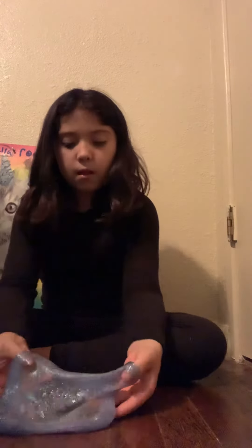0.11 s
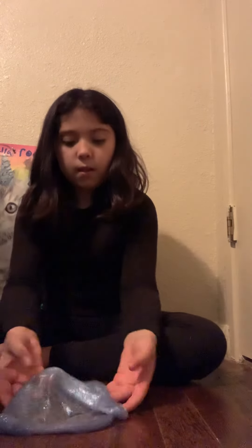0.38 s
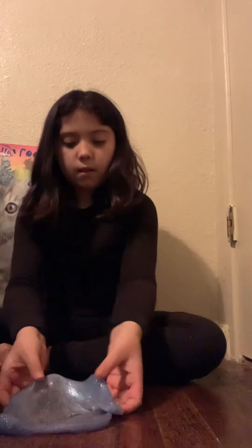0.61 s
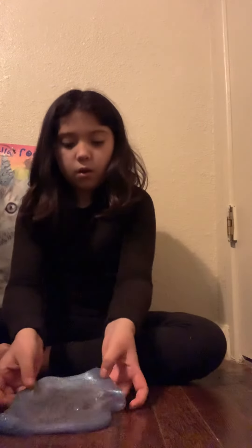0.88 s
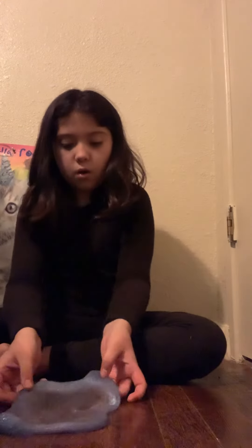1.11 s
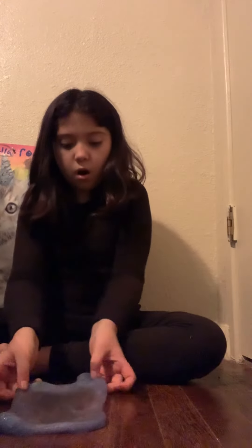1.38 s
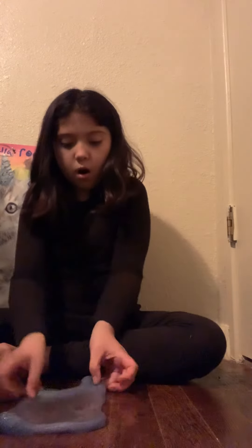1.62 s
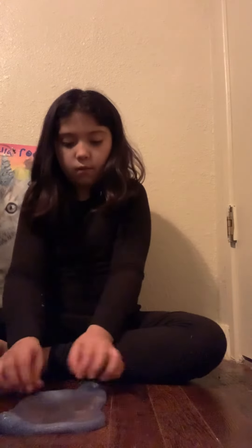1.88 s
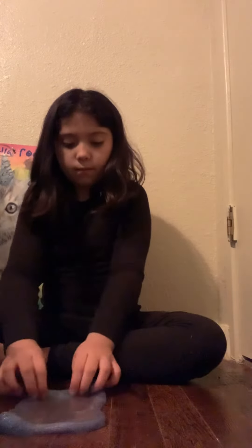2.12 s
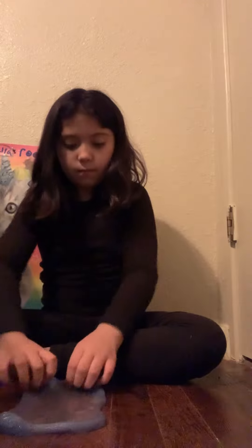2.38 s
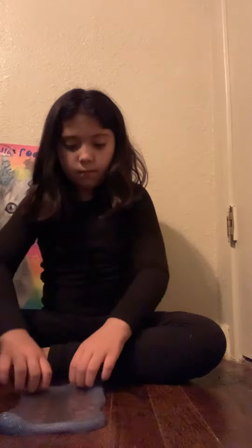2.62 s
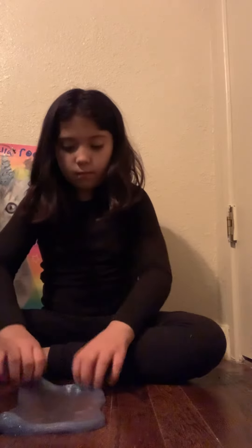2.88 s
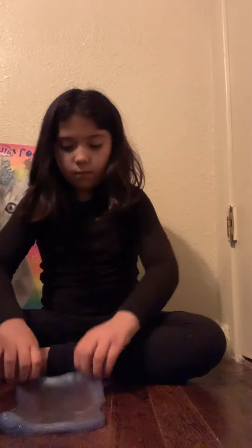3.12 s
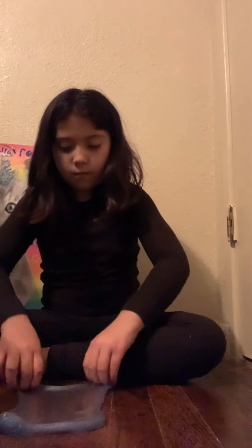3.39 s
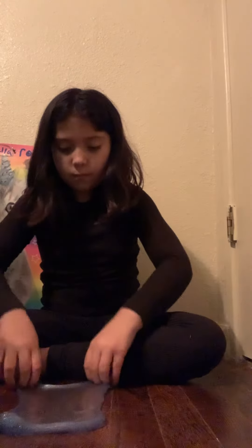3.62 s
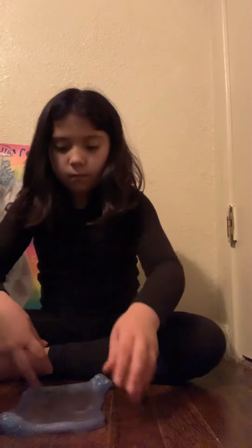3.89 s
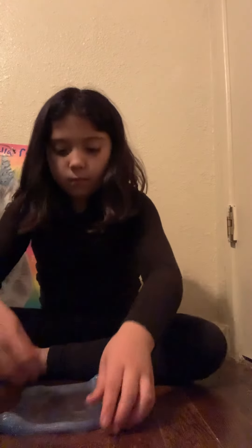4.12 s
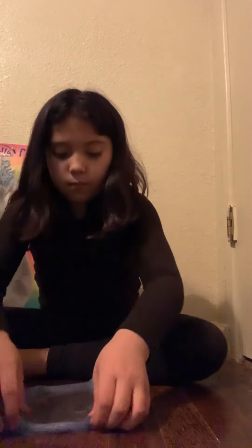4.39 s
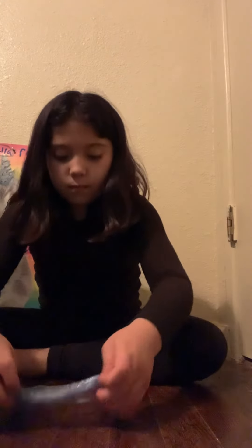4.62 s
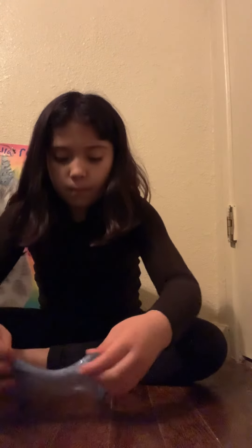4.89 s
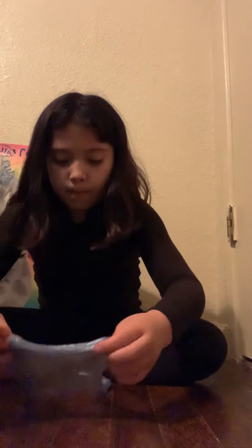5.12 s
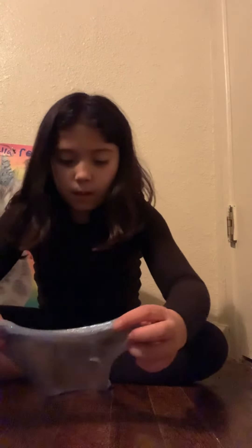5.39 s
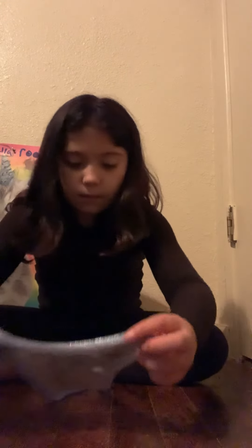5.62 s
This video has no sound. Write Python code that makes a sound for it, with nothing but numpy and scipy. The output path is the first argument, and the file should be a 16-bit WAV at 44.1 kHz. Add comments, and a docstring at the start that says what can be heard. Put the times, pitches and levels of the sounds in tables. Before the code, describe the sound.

Steady hammering on wood echoes through a home, about three blows a second, while someone quietly handles sticky putty close by.

```python
"""The tail of a hammer blow already rings over a quiet hum and a fine putty crackle; more blows follow.
Each runs ahead through the floor as a thud of filtered noise, then knocks: short pulses through wood resonances.
Banded noise then builds and dies as the rooms' diffuse tail, with decaying sines for the low air and panel modes.
Between blows, close to the microphone, putty peels in soft noise bursts, one longer and lower like a breathy squeak.
Brief sine cycles answered by noise make a dull knock just ahead of an early blow, then finger bumps and putty pops."""
import sys
import numpy as np
from scipy import signal
from scipy.fft import rfft, irfft, next_fast_len
from scipy.io import wavfile
from scipy.ndimage import uniform_filter1d, minimum_filter1d

SR = 44100
rng = np.random.default_rng(int(sys.argv[2]) if len(sys.argv) > 2 else 0)


def nominal_scale(level):
    """Amplitude ratio for a level in decibels (scalar or array-like)."""
    x = np.asarray(level, float) / 20
    return 10 ** x


def wav_record(signal):
    """Record a signal, one row per channel, as 16-bit PCM in the file named by sys.argv[1]."""
    frames = np.transpose(np.atleast_2d(signal))
    bounded = np.clip(frames, -1, 1)
    # unit amplitude maps onto the largest positive 16-bit level
    quanta = np.round(bounded * 32767).astype(np.int16)
    wavfile.write(sys.argv[1], SR, quanta)


N = 253838

# hammer blows: time_s, level_db, wood_ring_hz, weight_db, squareness_db
HAMMER_BLOWS = [(-0.27, -17, 1700, 9, 5), (0.046, -15, 1450, 3.5, -3.5), (0.4245, -15.5, 1450, 5, 3),
                (0.7918, -14, 1720, 2, -2), (1.1442, -15, 1800, 1.9, 0.6), (1.512, -13.5, 1710, 1.2, -1),
                (1.8482, -13, 1720, 3.1, 1), (2.225, -13, 1770, -0.7, 2.1), (2.668, -27, 1710, -5.5, -0.5),
                (2.9867, -21, 1830, 4, 1), (3.3267, -13.5, 1690, 2.7, 1.5), (3.7045, -13.5, 1900, 4, 3.5),
                (4.0737, -14.5, 1535, 3.5, 2.5), (4.5378, -19, 2000, 1.4, -0.1),
                (4.8677, -15.5, 1940, 3, 2), (5.2381, -14.5, 1980, 2.5, 2.5),
                (5.5967, -14.5, 1690, 0.7, 1.8)]
# how a blow colours its sound: freq_hz, plain_db, db_per_weight_db, db_per_squareness_db
# weight drives the low boards and the top sheen; a square blow trades floor boom for body and brightness
STRIKE_COLOUR = [(111, -1.4, 0.17, -0.95), (307, -0.5, 1.14, 0.32), (910, 0, 0.3, 1.36), (1840, 0, 0, 0),
                 (2860, -0.25, 0, 0.54), (4560, -2, -0.18, 0.67), (8000, -2.5, 0.2, 0.52),
                 (11900, -2, 1.6, -0.36)]
# first arrivals of a blow off the nearest walls, before scatter: delay_s, level_db, inverted (true or false)
FIRST_ARRIVALS = [(0, 3, False), (.0037, 6, True), (.008, 4.5, False), (0.015, 1, False),
                  (0.025, -12, True)]
# resonances of the struck wood in the first arrivals: freq_hz, width_hz, level_db
WOOD_RESONANCES = [(890, 64, -19.5), (1450, 650, -11.5), (1720, 236, 4), (4240, 240, 18.5),
                   (7500, 900, -26)]
# narrow bands of the ringing steel head, before scatter: freq_hz, width_hz, level_db
STEEL_RESONANCES = [(3510, 940, -26.5), (7350, 1430, 1), (8030, 160, 0.5), (10200, 1130, -1),
                    (14350, 350, -5.5)]
# diffuse tail colour, relative: freq_hz, density_db (per Hz)
TAIL_COLOUR = [(30, -15), (52, -5), (93, 4), (434, -6.5), (763, -9), (1100, -6.5), (1920, -5),
               (2550, -12.5), (3950, -7), (4490, -12), (8000, -22), (8400, -24.5), (12500, -30.5),
               (15500, -30)]
# how the rooms answer: freq_hz, t60_s, build_up_s, likeness_from_blow_to_blow (0-1)
ROOM_DECAY = [(50, 0.58, 0.017, 0.84), (121.2, 0.51, 0.077, 1), (350, 0.44, 0.0082, 0.94),
              (950, 0.43, 0.0042, 0.26), (2430, 0.42, 0.0057, 0.54), (4810, 0.39, 0.0081, 1),
              (8000, 0.28, 0.01, 0), (11000, 0.22, 0.006, 1), (15000, 0.21, 0.0091, .3)]
# air and panel modes excited by every blow, relative and before scatter: freq_hz, level_db, t60_s
HOUSE_MODES = [(56, -6, 1.0), (102, -9, .7), (236, -6, .5), (260, -8, .5), (528, -9, .45), (628, -10, .45),
               (943, -14, .45), (1126, -14, .45), (1462, -10, .45), (1550, -13, .45), (1647, -11, .45),
               (1719, -10, .45), (1878, -14, .45), (1951, -14, .45), (2065, -12, .45), (2258, -16, .45)]
# noise floor colour, relative: freq_hz, density_db (per Hz)
HOUSE_NOISE = [(18, -38), (30, -10), (65, 2.5), (153, -10.5), (240, -4), (742, -28.5), (1880, -32),
               (2600, -32), (3880, -35), (12000, -65), (15600, -82), (22000, -120)]
# how busy the hands are with the putty: time_s, crackle_level_db
PUTTY_RUSTLE = [(0, -79), (1.202, -92), (1.7, -77), (2.201, -82), (2.6, -90), (3.5, -82), (4.2, -92),
                (4.451, -69.5), (4.6, -85), (5.15, -78), (5.45, -92), (5.76, -70)]
# putty peels, and one longer, lower breathy squeak: start_s, level_db, centre_hz, length_s
SOFT_BURSTS = [(0.107, -60, 13500, 0.016), (0.227, -68.5, 9000, 0.049), (1.682, -66, 11000, 0.023),
               (2.165, -70, 8000, 0.0064), (2.205, -65, 8000, 0.012), (3.505, -72, 11000, 0.0038),
               (3.58, -66, 11000, 0.012), (3.649, -62, 7000, 0.048), (4.338, -71, 8550, 0.006),
               (4.397, -58.5, 5960, 0.0077), (4.406, -67, 9050, 0.003), (4.461, -63, 2230, 0.08),
               (5.112, -68, 11000, 0.0037), (5.183, -65, 6200, 0.03), (5.212, -65, 7500, 0.021),
               (5.41, -69, 9900, .035)]
# finger bumps, putty pops, and a dull knock through the floor just ahead of a blow:
# start_s, level_db, pitch_hz, length_cycles
BUMPS_AND_POPS = [(0.389, -51, 597, 2.5), (0.391, -44, 292, 4.1), (2.667, -44, 304, 2.5),
                  (2.846, -47, 890, 2.4), (2.847, -38.5, 324, 1.5), (2.929, -43.5, 322, 1.6),
                  (2.945, -48, 690, 3.7), (3.2, -38, 2290, 3), (3.204, -36.5, 323, 1.3),
                  (3.215, -39.5, 1400, 3), (3.65, -44.5, 1520, 3.5)]

SCATTER_DB = 2.5  # spread of the house modes and steel bands from blow to blow
HARD_BLOW_DB = -13  # knock and ring gain a further dB for each dB of blow level above this, and lose it below


def unit(x):
    """Scale to rms 1."""
    return x / np.sqrt(np.mean(x ** 2) + 1e-20)


def along(hz, at_hz, values):
    """Values read on a log frequency axis."""
    return np.interp(np.log(hz + 1), np.log(np.asarray(at_hz) + 1), values)


def colour(curve):
    """A zero-phase response drawn by (Hz, dB) points."""
    return lambda f: nominal_scale(along(f, *np.transpose(curve)))


def filtered(x, response):
    """x times a complex response of frequency."""
    m = next_fast_len(x.shape[-1] + 8192)
    spectrum = rfft(x, m) * response(np.fft.rfftfreq(m, 1 / SR))
    return irfft(spectrum, m)[..., :x.shape[-1]]


def band(lo_hz, hi_hz):
    """A causal band-pass response."""
    return lambda f: (1j * f / (lo_hz + 1j * f)) ** 2 * (hi_hz / (hi_hz + 1j * f)) ** 2


def resonances(modes):
    """The causal response of (Hz, width Hz, dB) modes, summed with alternating sign."""
    def response(f):
        total = 0
        for k, (hz, width, db) in enumerate(modes):
            total = total + (-1) ** k * nominal_scale(db) * 1j * f * width / (hz * hz - f * f + 1j * f * width)
        return total
    return response


def add(track, s, sound):
    """Mix a sound in at time s, trimming whatever falls outside the track."""
    start = round(s * SR)
    sound = sound[max(-start, 0):]
    part = track[max(start, 0):][:len(sound)]
    part += sound[:len(part)]


def floor_thud(t):
    """The boards carry a dull noise burst that rises at once and is cut short while still decaying."""
    lo_hz, hi_hz, rise_s, t60_s = 130, 766, 0.0017, 0.39
    dull = lambda f: band(lo_hz, 1200)(f) / np.sqrt(1 + (f / hi_hz) ** 12)
    noise = unit(filtered(rng.standard_normal(len(t)), dull))
    return noise * (1 - np.exp(-t / rise_s)) * nominal_scale(-60 * t / t60_s)


def knock(t):
    """A short hard contact ringing the wood, copied by the nearest walls."""
    contact = np.hanning(round(0.00073 * SR))
    hits = np.zeros(len(t))
    for delay_s, level_db, inverted in FIRST_ARRIVALS:
        late_s = abs(rng.normal(0, 0.00018))
        level = (-1) ** inverted * nominal_scale(level_db + rng.normal(0, 4.9))
        add(hits, delay_s + late_s, level * contact)
    ring = filtered(hits, lambda f: resonances(WOOD_RESONANCES)(f) * band(500, 12000)(f))
    # the steel face flashes at the very top
    glint = np.exp(-((t - .011) / .0025) ** 2) * rng.standard_normal(len(t))
    glint = filtered(glint, resonances([(15000, 1300, 0)]))
    return ring / np.abs(ring).max() + nominal_scale(-20) * glint


def diffuse_tail(same_path, fresh, t, count=22):
    """Noise split into bands; each band builds up and dies at the pace of the rooms."""
    far_db, far_longer, far_top_hz = -29, 2.1, 4000  # a larger room rings on underneath, dull with distance
    centre = np.geomspace(40, 16000, count)
    place = np.interp(np.log(np.fft.rfftfreq(len(t), 1 / SR) + 1), np.log(centre), np.arange(count))
    share = np.clip(1 - np.abs(place - np.arange(count)[:, None]), 0, 1)  # overlapping triangles
    hz, *columns = np.transpose(ROOM_DECAY)
    t60, rise, alike = (along(centre, hz, np.abs(c))[:, None] for c in columns)
    alike = np.clip(alike, 0, 1)
    blend = alike * rfft(same_path) + np.sqrt(1 - alike ** 2) * rfft(fresh)
    bands = irfft(share * blend, len(t))
    near_room = nominal_scale(-60 * t / t60)
    far_room = nominal_scale(far_db - 60 * t / (far_longer * t60)) / (1 + (centre[:, None] / far_top_hz) ** 2)
    return np.sum((1 - np.exp(-t / rise)) * (near_room + far_room) * bands, axis=0)


def house_modes(t):
    """Air and panels ring as decaying sines; neighbours start near opposite phase, then beat."""
    out = np.zeros(len(t))
    for k, (hz, level_db, t60_s) in enumerate(HOUSE_MODES):
        decay = nominal_scale(level_db - 16.5 + rng.normal(0, SCATTER_DB) - 60 * t / t60_s)
        build_up = 1 - np.exp(-t * hz / 1.15)
        out += decay * build_up * np.sin(2 * np.pi * hz * t + np.pi * k + rng.normal(0, 0.22))
    return out


def strike_response(ring_hz, hardness_db, weight_db, square_db):
    """The blow's tone, with the struck spot's two rings and the steel head's bands on top of it."""
    width_hz, overtone, overtone_width_hz, overtone_db = 182, 2.11, 320, -11.5  # overtone: multiple of the ring
    modes = [(ring_hz, width_hz, hardness_db),
             (overtone * ring_hz, overtone_width_hz, hardness_db + overtone_db)]
    modes += [(hz, width, db + rng.normal(0, SCATTER_DB)) for hz, width, db in STEEL_RESONANCES]
    hz, plain_db, per_weight, per_square = np.transpose(STRIKE_COLOUR)
    tone_db = plain_db + per_weight * weight_db + per_square * square_db
    # one mode at a time, so that all add with the same sign
    return lambda f: nominal_scale(along(f, hz, tone_db)) * (1 + sum(resonances([mode])(f) for mode in modes))


def hammer():
    """Blows reach the floor first as a thud through the boards, then through the air as knock, tail and modes."""
    board_lead_s, air_lead_s = .021, .0035  # each starts this long before the blow's table time
    thud_db, thud_per_weight, thud_per_square = -40.5, 0.8, .9  # base level; dB per dB
    out, t = np.zeros(N), np.arange(2 ** 15) / SR
    tail_noise = lambda: unit(filtered(rng.standard_normal(len(t)), colour(TAIL_COLOUR)))
    same_path = tail_noise()  # the way from hammer to microphone hardly changes
    for s, level_db, ring_hz, weight_db, square_db in HAMMER_BLOWS:
        thud_level_db = level_db + thud_db + thud_per_weight * weight_db + thud_per_square * square_db
        add(out, s - board_lead_s, nominal_scale(thud_level_db) * floor_thud(t[:2000]))
        hardness_db = level_db - HARD_BLOW_DB
        airborne = nominal_scale(hardness_db - 7) * knock(t)
        airborne += nominal_scale(-8.5) * diffuse_tail(same_path, tail_noise(), t)
        airborne += house_modes(t)
        response = strike_response(ring_hz, hardness_db, weight_db, square_db)
        add(out, s - air_lead_s, nominal_scale(level_db) * filtered(airborne, response))
    return out


def house():
    """Steady low hum and hiss of the quiet house, as coloured noise."""
    return nominal_scale(-60.5) * unit(filtered(rng.standard_normal(N), colour(HOUSE_NOISE)))


def putty_and_squeak():
    """Sticky putty crackles in tiny random clicks; band-passed noise bursts make its peels and a breathy squeak."""
    chance, size = rng.random((2, N))
    clicks = (chance < 2500 / SR) * nominal_scale(-2.5 * np.log(size + 1e-9)) * rng.choice([-1, 1], N)  # 2500 a second
    grains = clicks + .15 * rng.standard_normal(N)
    crackle = unit(filtered(grains, band(2500, 10000)))
    out = nominal_scale(np.interp(np.arange(N) / SR, *np.transpose(PUTTY_RUSTLE))) * crackle
    for s, level_db, hz, length_s in SOFT_BURSTS:
        noise = rng.standard_normal(round(length_s * SR))
        burst = filtered(noise, lambda f: band(.7 * hz, 1.5 * hz)(f) ** 2)
        add(out, s, nominal_scale(level_db) * unit(burst) * np.sqrt(np.hanning(len(burst))))
    return out


def bumps_and_pops():
    """A dull floor knock, finger bumps and putty pops: a few smooth cycles, then a short answer of the boards."""
    boards_db, boards_rise_s, boards_t60_s = -10.5, 0.0027, 0.077
    out, t = np.zeros(N), np.arange(SR // 10) / SR
    for s, level_db, hz, cycles in BUMPS_AND_POPS:
        push = np.sin(2 * np.pi * hz * t) * np.exp(-(t * hz / cycles) ** 2)
        near_pitch = lambda f: band(.6 * hz, min(6 * hz, 3000))(f) ** 2
        boards = unit(filtered(rng.standard_normal(len(t)), near_pitch))
        boards = boards * nominal_scale(boards_db - 60 * t / boards_t60_s) * (1 - np.exp(-t / boards_rise_s))
        add(out, s, nominal_scale(level_db) * (push + boards))
    return out


def scene():
    """All sources at one microphone."""
    return (hammer() + house() + putty_and_squeak() + bumps_and_pops())[None]


def low_pass(x):
    """Removes everything above the highest recorded frequency."""
    return signal.sosfilt(signal.butter(12, 16820, fs=SR, output="sos"), x)


def record(dry):
    """The phone cuts the deepest bass and all above its band limit, then eases down loud moments."""
    bass_cut_hz, top_hz, ease_above_db, ease_db_per_db = 51.0, 15950, -11, 0.42
    bass_cut = lambda f: f ** 4 / np.sqrt(f ** 8 + bass_cut_hz ** 8)
    heard = filtered(dry, lambda f: bass_cut(f) * np.clip((top_hz - f) / 250, 0, 1))
    need = np.minimum(1, nominal_scale(ease_above_db) / (np.abs(heard) + 1e-9)) ** ease_db_per_db
    gain = uniform_filter1d(minimum_filter1d(need, size=301), size=301)  # held, then smoothed, over 7 ms
    return low_pass(heard * gain)


dry = scene()
out = record(dry)
wav_record(out)
```